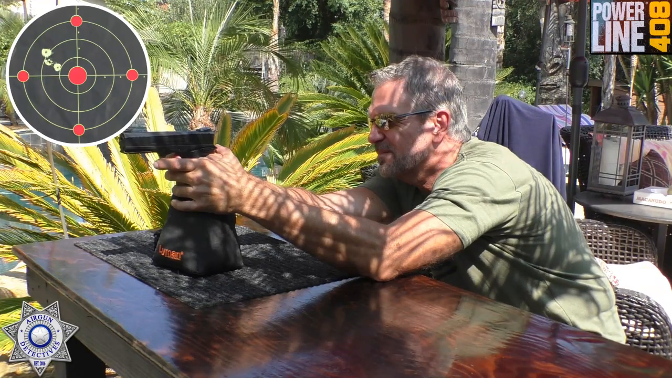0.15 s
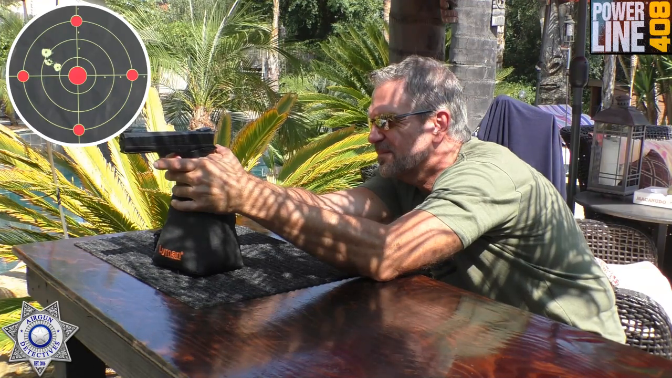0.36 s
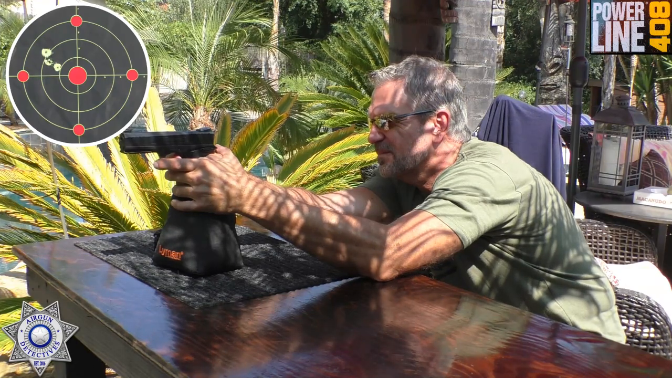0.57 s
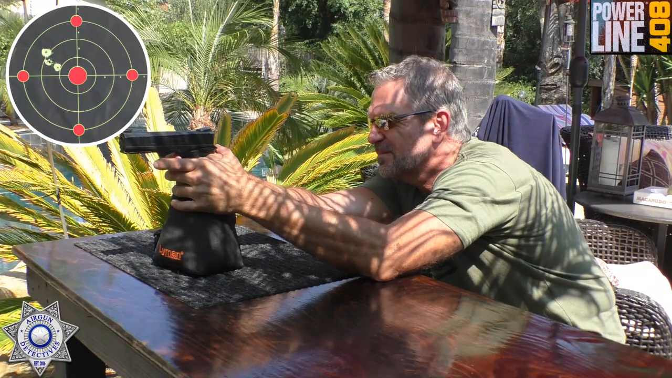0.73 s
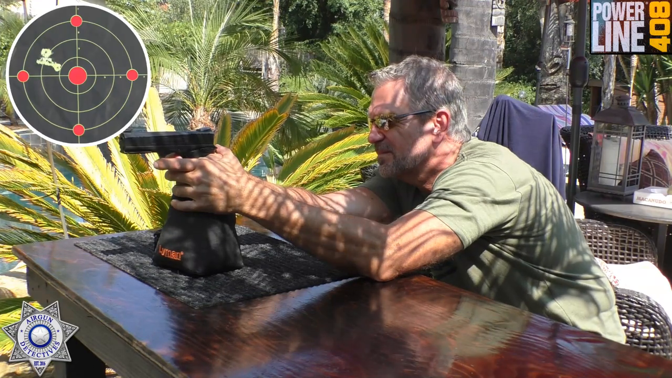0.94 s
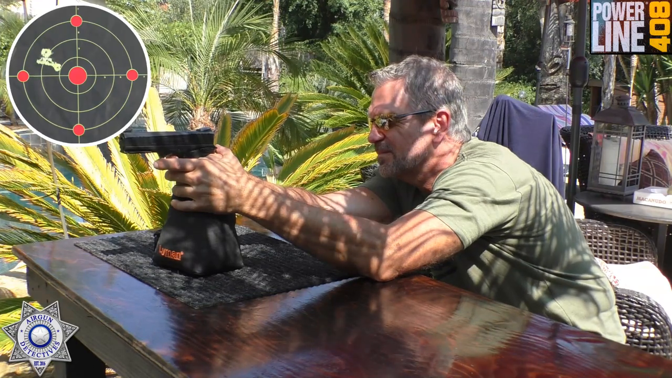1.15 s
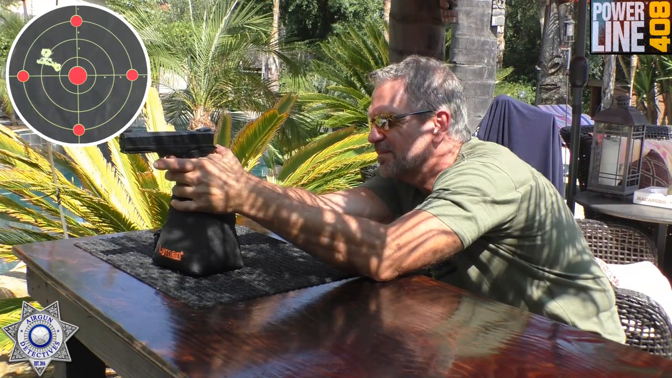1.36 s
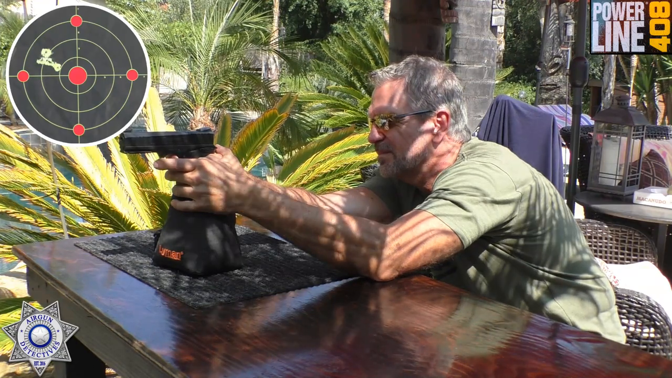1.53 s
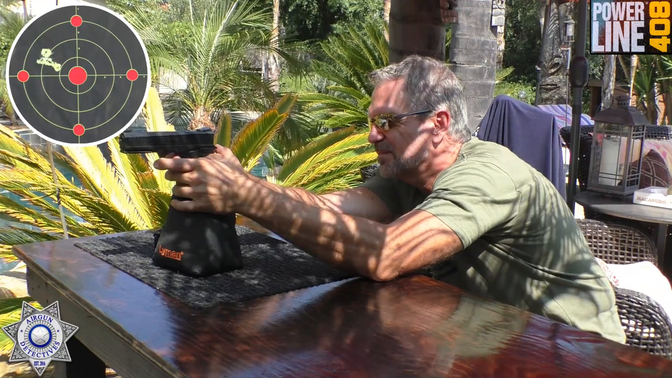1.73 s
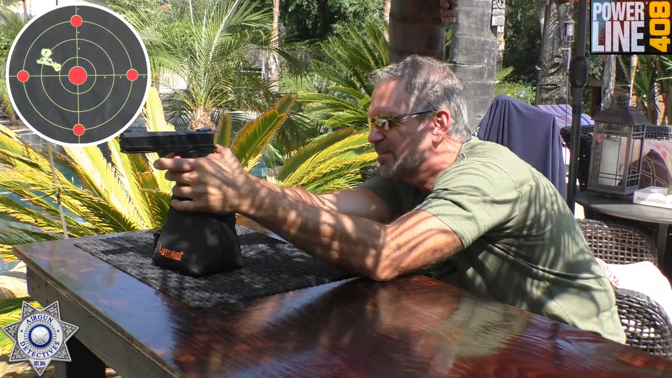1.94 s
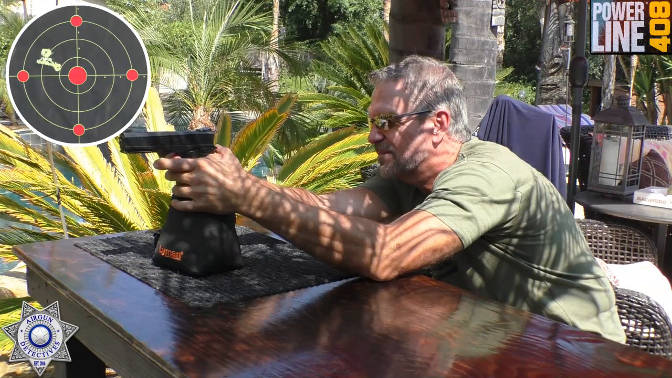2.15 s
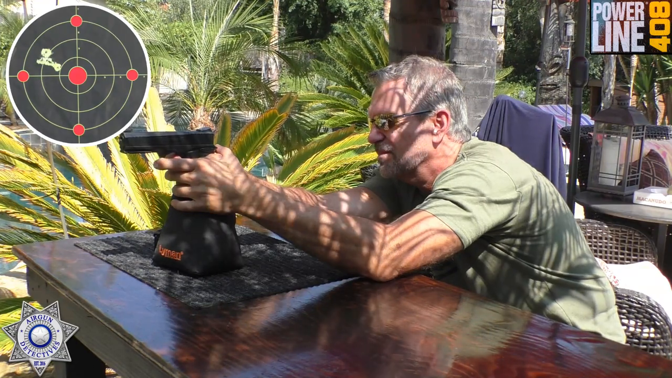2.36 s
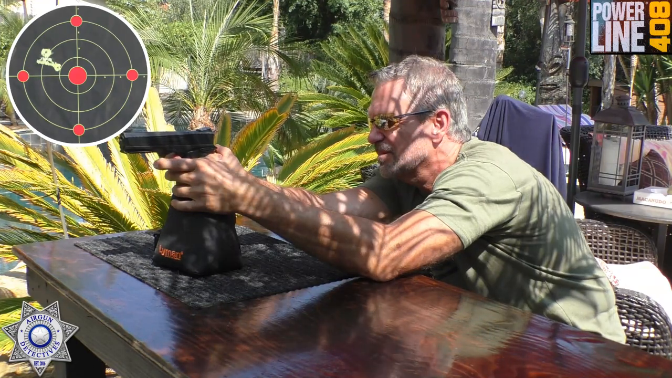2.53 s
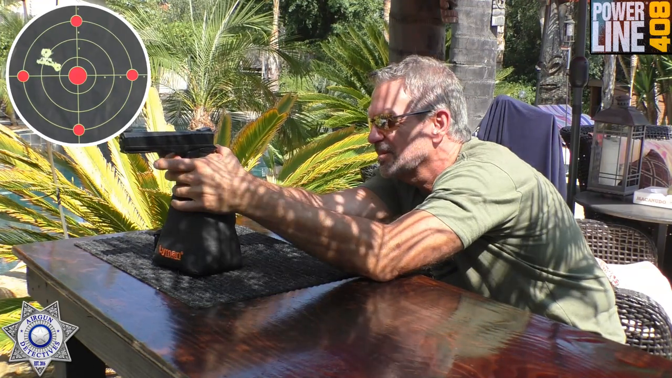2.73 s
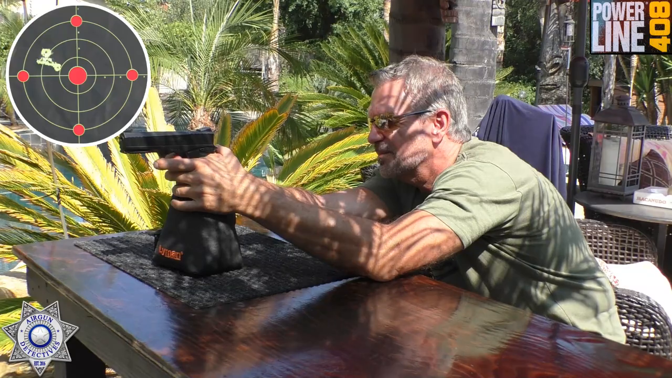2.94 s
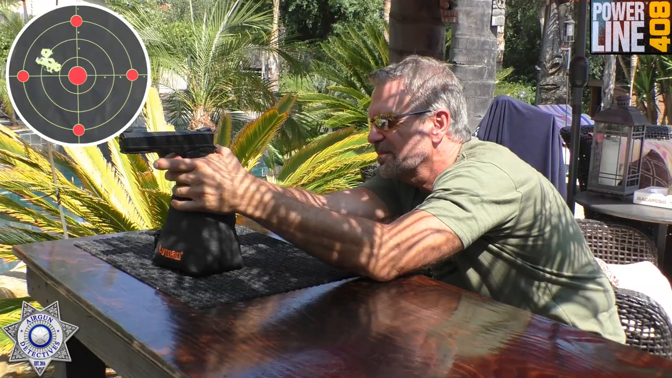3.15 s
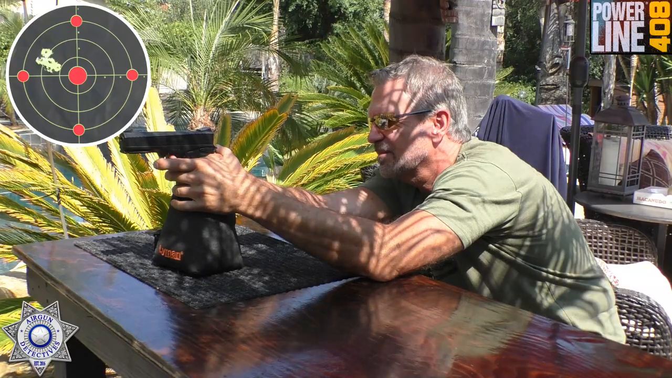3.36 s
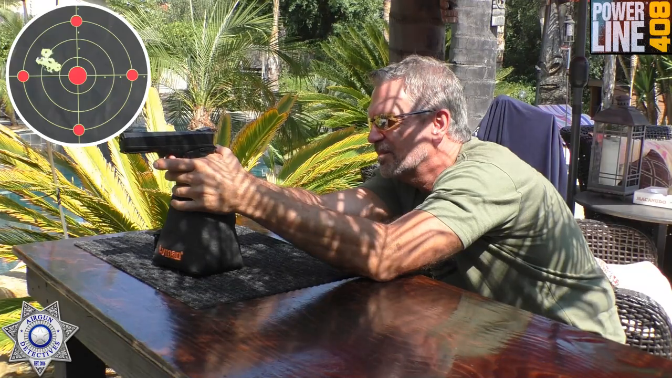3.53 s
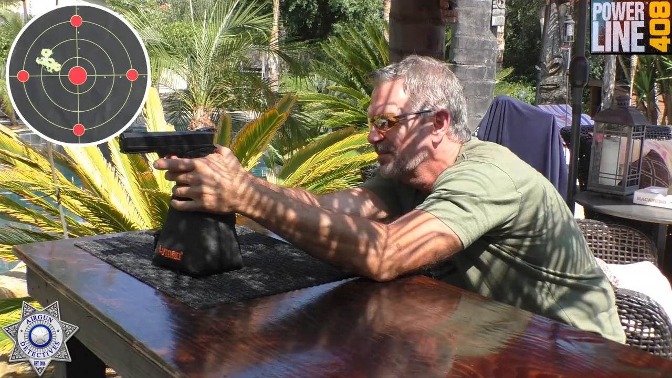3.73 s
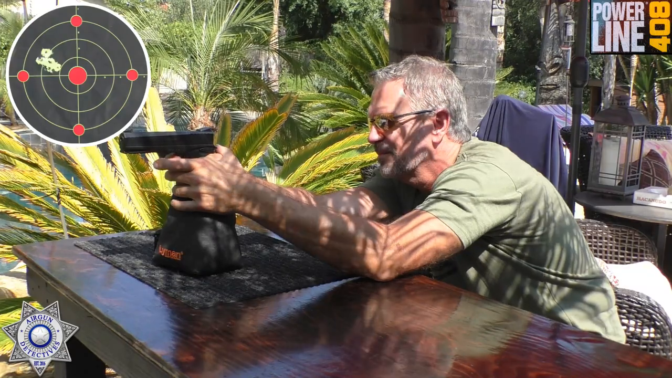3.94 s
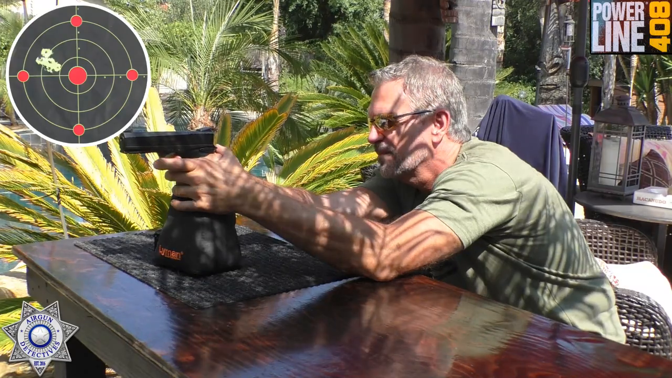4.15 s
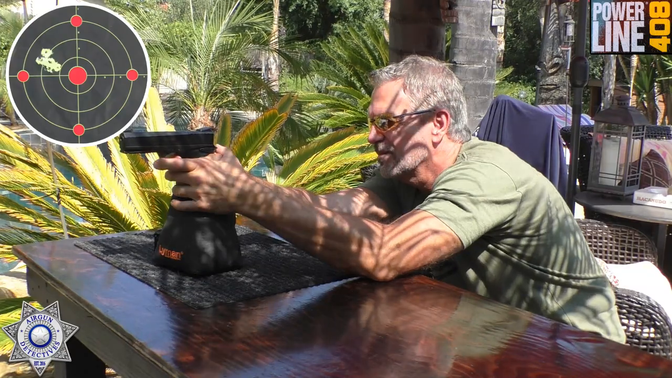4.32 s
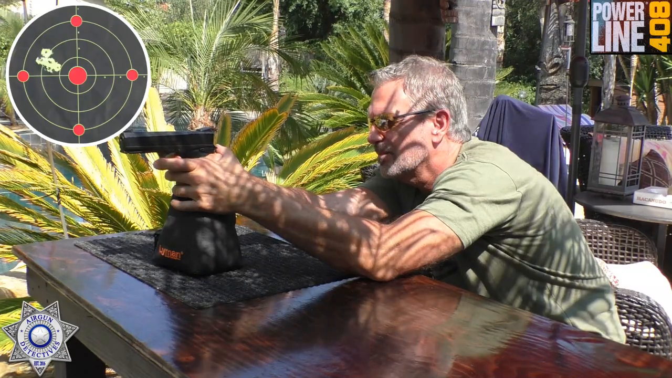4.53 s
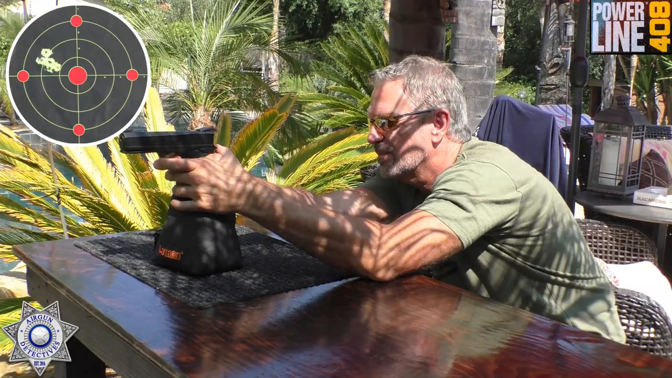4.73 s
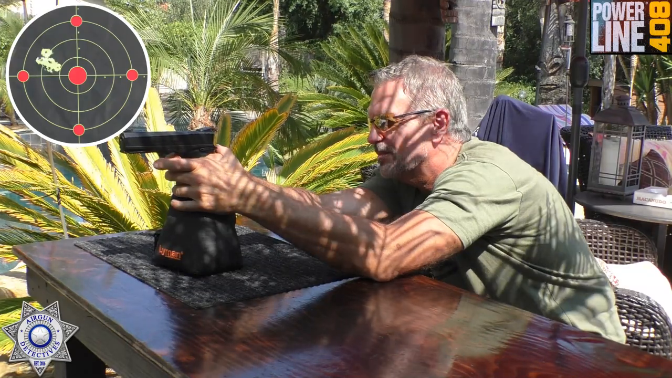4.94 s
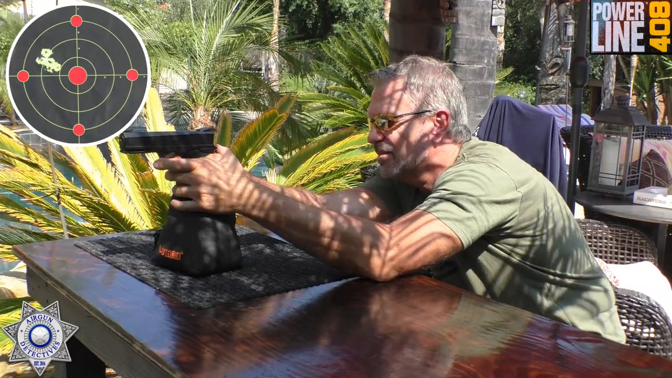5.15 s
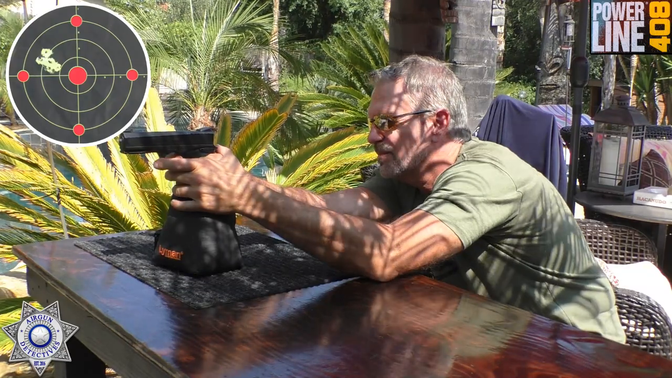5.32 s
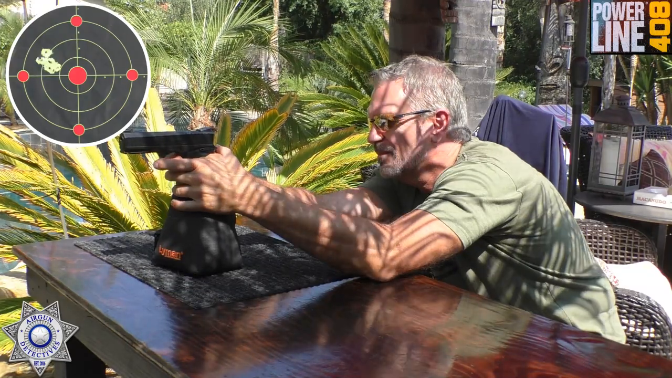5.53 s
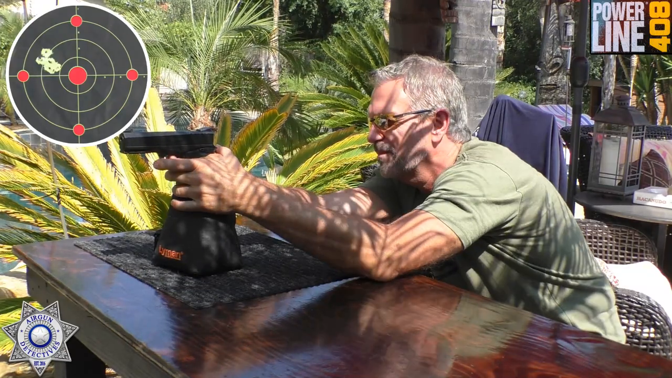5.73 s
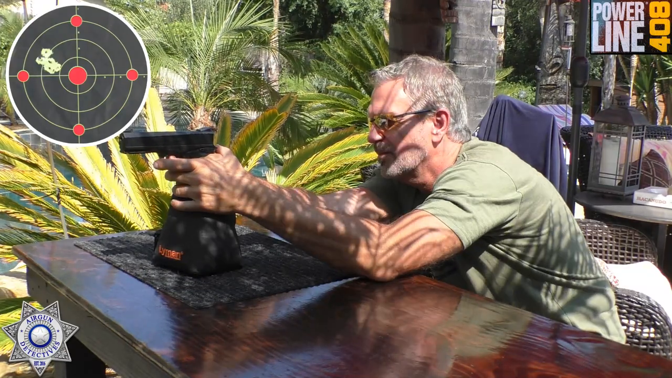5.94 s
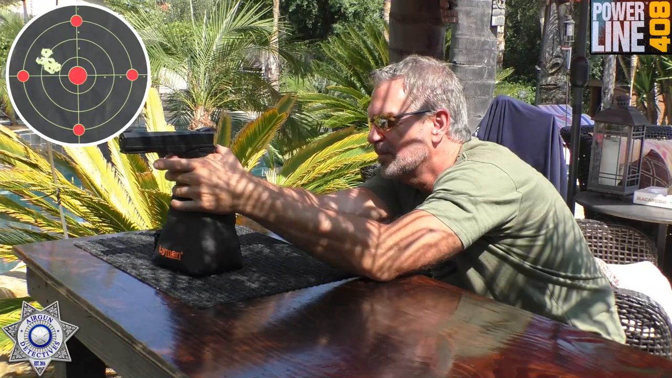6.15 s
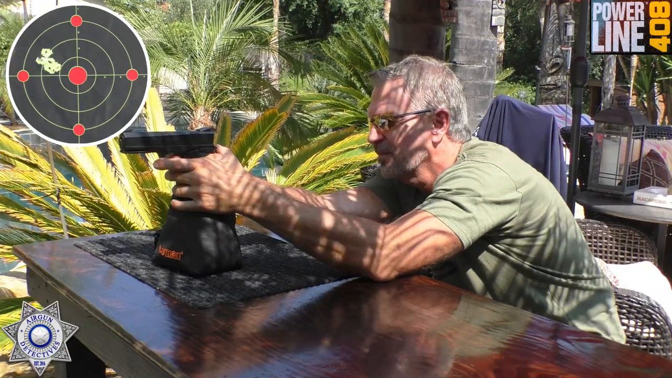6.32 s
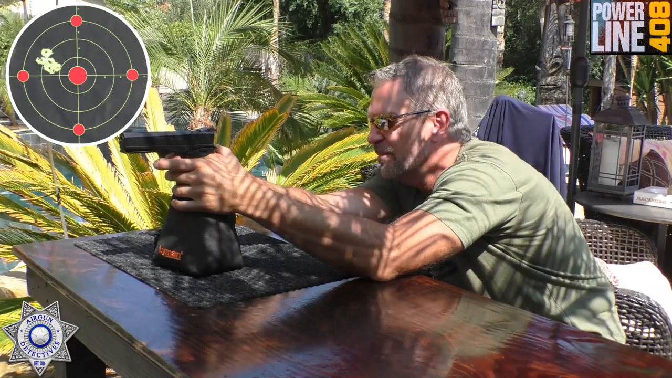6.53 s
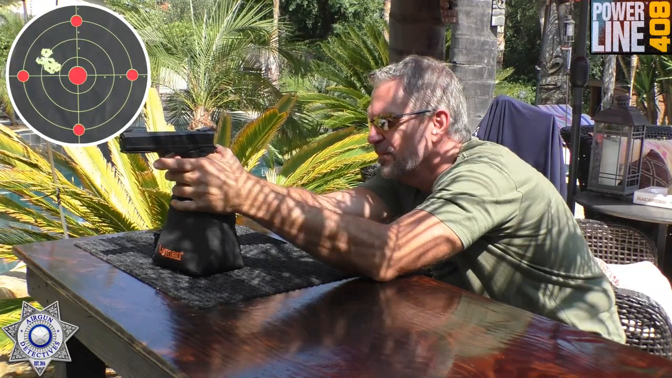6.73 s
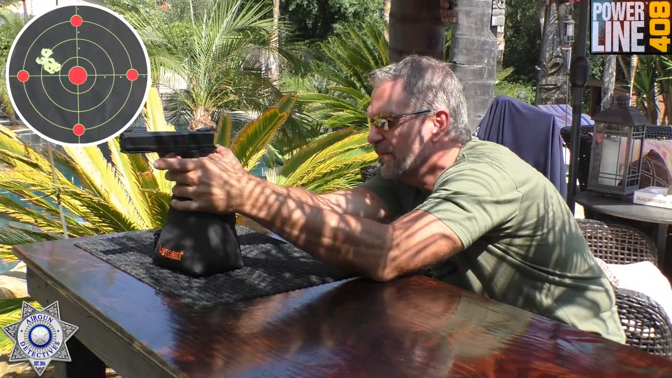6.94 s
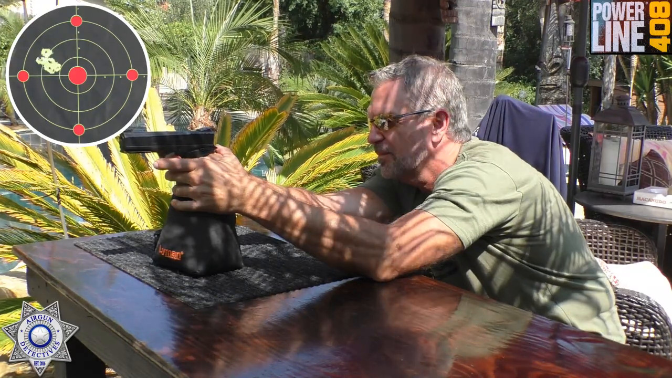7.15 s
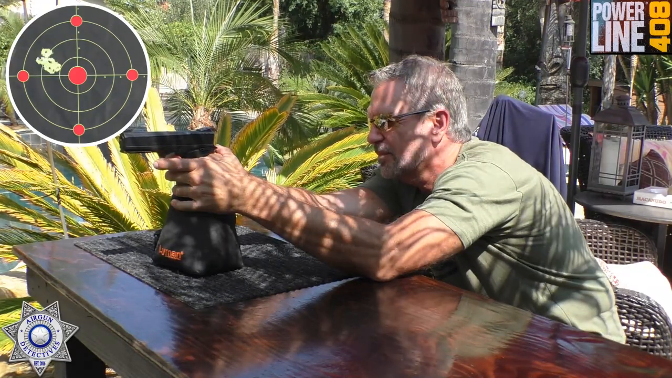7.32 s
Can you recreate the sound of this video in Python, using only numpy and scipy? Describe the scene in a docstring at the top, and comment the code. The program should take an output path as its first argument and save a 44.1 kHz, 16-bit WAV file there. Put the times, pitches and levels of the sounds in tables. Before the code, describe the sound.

A quiet garden opens with a soft rush of leaves and low, far traffic. At 0.8 seconds a close air pistol fires: a tiny scraping hammer run, then a loud, bright crack with a full midrange, brief steel ringing and a low gas puff. A fainter target smack lands some 0.07 seconds later, and the echo spreads through the trees, drawn out as the ducked level recovers. A steely tick at 1.17 and a double clack at 1.24 mark the trigger's return. Thin bird whistles fall at 1.4 and 2.4. The second shot comes at 3.0, with deeper thump, then clicks at 3.3 to 3.5. A very faint whistle follows at 4.0; a distant engine swells near 4.4. The third, slightly leaner crack comes at 5.3, with clicks at 5.7 and 5.8 and a tiny tick at 6.2. Dry fronds tick sparsely throughout; the breeze freshens towards the end.

```python
"""Far traffic and a soft rush of leaves, then a gas-powered air pistol fires three slow shots from a rest
on a garden table. Each shot: filtered noise for the hammer run, a short noise jet with ringing steel for
the crack, a decaying swell for the gas, a noise smack from the target and a noise tail for the garden echo.
The trigger returns with ticks and clacks of damped modes; dry fronds tick and a faint bird whistles in sines.
A gain control ducks at each crack and draws the echo out as it recovers."""
import sys
import numpy as np
from scipy import signal
from scipy.fft import rfft, irfft
from scipy.io import wavfile
from scipy.ndimage import uniform_filter1d, map_coordinates

SR = 44100
rng = np.random.default_rng(int(sys.argv[2]) if len(sys.argv) > 2 else 0)


def waveform_to_disk(signal):
    """Save audio, clipped to [-1, 1], as 16-bit WAV at the path in sys.argv[1]."""
    frames = np.transpose(np.atleast_2d(signal))
    scaled = np.clip(frames, -1, 1) * 32767
    samples = np.round(scaled).astype(np.int16)
    wavfile.write(sys.argv[1], SR, samples)


N = 329868  # samples


def amp(db):
    """Decibels to gain."""
    return 10 ** (np.asarray(db) / 20)


def unit(x):
    """Scale to rms 1."""
    return x / np.sqrt(np.mean(x ** 2) + 1e-20)


def seconds(length):
    """A time axis of the given length in seconds."""
    return np.arange(int(length * SR)) / SR


def add(track, s, sound):
    """Mix a sound into a track at time s."""
    start = max(round(s * SR), 0)
    room = track[..., start:start + sound.shape[-1]]
    room += sound[..., :room.shape[-1]]


def wobble(rate):
    """A smooth random curve as long as the scene, rate knots a second."""
    knots = rng.standard_normal(int(N * rate / SR) + 4)
    return map_coordinates(knots, [np.arange(N) * rate / SR])


def noise(size, alike):
    """White noise in two channels; alike is their correlation."""
    a, b = rng.standard_normal((2, size))
    turn = np.arccos(np.clip(alike, 0, 1)) / 2
    return np.cos(turn) * a + np.sin(turn) * np.array([b, -b])


def colour(x, points, size=8192):
    """Causal filter of unit energy through (Hz, dB) points."""
    f, db = np.transpose(points)
    gain = amp(np.interp(np.log(np.fft.rfftfreq(size, 1 / SR) + 1), np.log(f), db))
    # folding the cepstrum gives minimum phase
    cepstrum = irfft(np.log(gain + 1e-6))
    cepstrum[1:size // 2] *= 2
    cepstrum[size // 2 + 1:] = 0
    kernel = irfft(np.exp(rfft(cepstrum)))
    kernel = kernel / np.linalg.norm(kernel)
    return signal.fftconvolve(x, kernel[None], axes=1)[:, :x.shape[1]]


def fade(t, t60):
    """Exponential decay, 60 dB in t60 seconds."""
    return np.exp(-np.log(1000) * t / t60)


def attack(t, rise_s):
    """Exponential rise from silence towards 1."""
    return 1 - np.exp(-t / rise_s)


def ring(t, modes):
    """Damped modes (Hz, dB, t60 s), struck at new strengths each time."""
    strengths = amp(rng.normal(0, 1.5, len(modes)))
    total = 0
    for strength, (hz, db, t60) in zip(strengths, modes):
        tone = np.sin(2 * np.pi * (hz * t + rng.random()))
        total = total + strength * amp(db) * fade(t, t60) * tone
    return total


# The crack's spectrum before the body boost: pitch_hz [Hz], level_db [dB per Hz, relative]
CRACK_SPECTRUM = [(400, -1.5), (620, -2.5), (860, 0), (1080, 5), (1650, 1), (2100, 4), (3500, -4.5),
                  (4400, -1), (6300, -2), (7600, -10.5), (9500, 0), (10900, 3), (13000, 0), (16000, -4)]
# Single hard surfaces nearby: delay_s [s], level_db [dB]
NEARBY_SURFACES = [(.0055, -6.5), (.0069, -11), (0.015, -34), (0.034, -20)]
# Barrel and slide ringing on: pitch_hz [Hz], level_db [dB, relative], t60_s [s]
BARREL_MODES = [(2167, -3, .15), (5405, -5, .3), (5910, -6, .3), (6090, -3, .25), (6337, -5, .3),
                (6640, -5, .3), (7368, -6, .3), (8678, -3, .15), (8866, -6, .25), (10127, -5, .2),
                (10920, 0, .1), (12500, -2, .15)]


def muzzle(t, body_db):
    """The valve lets out a two-millisecond jet; nearby surfaces repeat its sharp front and the barrel rings."""
    # the jet holds all frequencies equally, at random phases; its treble differs between the channels
    jet = unit(irfft(np.exp(2j * np.pi * rng.random(size=45))))
    apart = amp(-17) * np.diff(rng.standard_normal(len(jet) + 1))
    crack = amp(-9.0) * fade(t, 0.026) * noise(len(t), 0.45)
    crack += amp(-26.5) * fade(t, 0.077) * noise(len(t), 0.63)
    add(crack, 0, np.array([jet + apart, jet - apart]))
    front = fade(t, 0.0044)
    for delay_s, level_db in NEARBY_SURFACES:
        add(crack, delay_s + rng.normal(0, 0.00018), amp(level_db) * front * noise(len(t), 0.32))
    # a fuller charge of gas swells the middle of the spectrum
    spectrum = [(hz, db + body_db * np.exp(-np.log(hz / 2400) ** 2)) for hz, db in CRACK_SPECTRUM]
    steel = amp(-34) * ring(t, BARREL_MODES)
    return colour(crack, spectrum) + steel


THUD_HZ, THUD_LAG_S, THUD_T60_S = 352, .0002, .013  # the table under the muzzle


def push(t, push_db, hz, thud_db):
    """The expanding gas: one swell of pressure, eddies in each channel and a thud from the table."""
    cycles = hz * t * (1 + 0.2 * np.array([[-1], [1]]))  # the swell lingers longer on the left
    swell = np.sin(2 * np.pi * cycles) * np.exp(-2.4 * cycles)
    eddies = colour(noise(len(t), 0), [(25, 1), (200, 0.5), (450, -2.5), (1500, -51)]) * fade(t, 0.02)
    since = np.maximum(t - THUD_LAG_S, 0)
    thud = np.sin(2 * np.pi * THUD_HZ * since) * fade(since, THUD_T60_S)
    air = amp(push_db) * (swell + amp(-9) * eddies) - amp(thud_db) * thud
    return signal.sosfilt(signal.butter(6, 480, fs=SR, output="sos"), air)


# Spectrum of the sliding hammer: pitch_hz [Hz], level_db [dB per Hz, relative]
HAMMER_SPECTRUM = [(200, -28), (1000, 1.5), (1650, -34), (2300, -4), (5000, -19), (8000, -6), (10500, -11),
                   (16000, -47)]


def hammer(t):
    """The hammer runs forward: a scrape that grows until the crack."""
    return colour(noise(len(t), 1.0), HAMMER_SPECTRUM) * attack(t, 0.0035)


# Spectrum of the struck target: pitch_hz [Hz], level_db [dB per Hz, relative]
SMACK_SPECTRUM = [(100, -12), (400, 1.5), (750, -10), (1200, 0.5), (3000, 1), (5000, -2.5), (9000, 0.5),
                  (12000, -2.5), (16000, -11)]


def smack(t):
    """The pellet punches the target, which rattles briefly."""
    decay = fade(t, 0.12) + .4 * fade(t, .006)
    return colour(noise(len(t), 0.32) * decay, SMACK_SPECTRUM)


# The patio answers at once, the trees after their round trip, distant surfaces faintly
PATIO_DB, PATIO_T60_S = -19, 0.22
TREES_DB, TREES_DELAY_S, TREES_RISE_S, TREES_T60_S = -30.5, 0.058, .008, 1.19
EDGE_S, EDGE_T60_S = 0.26, 0.72  # round trip to the garden's edge, and the extra decay beyond it
DISTANT_DB, DISTANT_T60_S = -56, 4.4


def echo_envelope(t):
    """Three decays add in power: patio, trees up to the garden's edge, and distant surfaces."""
    patio = amp(PATIO_DB) * fade(t, PATIO_T60_S)
    since = np.maximum(t - TREES_DELAY_S, 0)
    beyond = np.maximum(t - EDGE_S, 0)
    trees = amp(TREES_DB) * attack(since, TREES_RISE_S) * fade(since, TREES_T60_S) * fade(beyond, EDGE_T60_S)
    distant = amp(DISTANT_DB) * fade(t, DISTANT_T60_S)
    return np.sqrt(patio ** 2 + trees ** 2 + distant ** 2)


# Spectrum of the echo before its treble loss: pitch_hz [Hz], level_db [dB per Hz, relative]
GARDEN_SPECTRUM = [(80, -15), (350, -0.5), (750, -15.5), (1200, -1), (2200, 0), (4000, -2.5), (7500, -2),
                   (12300, -4), (13500, -9), (16000, -17)]


def garden(t):
    """Countless echoes off foliage; the farther they travel, the more treble they lose."""
    hz, delay, z = signal.stft(colour(noise(len(t), 0.65), GARDEN_SPECTRUM), SR, nperseg=256)
    lost_db = 20 * delay * (hz[:, None] / 10000) ** 2
    tail = signal.istft(z * amp(-lost_db), SR, nperseg=256)[1][:, :len(t)]
    unevenness_db = 0.58 * wobble(200)[:len(t)] + wobble(35.7)[:len(t)]
    return tail * echo_envelope(t) * amp(unevenness_db)


# The shots: start_s [s], crack_db [dB], body_db (midrange boost) [dB], push_db (gas) [dB], push_hz [Hz],
# thud_db (table) [dB], echo_db [dB], smack_db (target) [dB], flight_s (smack delay) [s]; relative levels
SHOT_LIST = [(0.8166, 5.5, 8.5, 0, 210, -14, 1.5, -20.5, .0654),
             (3.0175, 4.5, 4, 4, 115, 0, 1, -19.5, .0665), (5.3450, 3, -1.5, 0, 125, 3, 0.5, -24.5, .0695)]
PUSH_LEAD_S = .001  # head start that makes up for the low-pass delay, so the swell begins with the crack


def shots():
    """Hammer run, muzzle crack, gas push, target smack and echo of every shot."""
    out, t, run = np.zeros((2, N)), seconds(0.99), seconds(0.0062)
    for start_s, crack_db, body_db, push_db, push_hz, thud_db, echo_db, smack_db, flight_s in SHOT_LIST:
        add(out, start_s - len(run) / SR, amp(-22.5) * hammer(run))
        balance = amp([[.6], [-.6]])  # dB, slightly to the left
        add(out, start_s, amp(crack_db) * muzzle(t, body_db) * balance)
        add(out, start_s - PUSH_LEAD_S, push(t, push_db, push_hz, thud_db))
        add(out, start_s + flight_s, amp(smack_db) * smack(t))
        add(out, start_s, amp(echo_db) * garden(t))
    return out


def contact(t, resonances, scrape_db, scrape_t60, spread_db, spread_t60):
    """Steel on steel: short resonances, a burst of noise and the scatter from the table and roof."""
    # a wider resonance dies sooner
    modes = [(hz, db, np.log(1000) / (np.pi * width)) for hz, width, db in resonances]
    burst = amp(scrape_db) * fade(t, scrape_t60) * noise(len(t), .92)
    scatter = amp(spread_db) * fade(t, spread_t60) * noise(len(t), 0.68)
    blow = (ring(t, modes) + burst) * attack(t, 0.00044)
    spectrum = [(200, -13), (720, -18.0), (1100, -10.5), (1900, 0), (5000, -2), (10000, -2.5), (16000, -5.5)]
    return colour(blow + scatter, spectrum)


# The pawl slips back: start_s [s], level_db [dB, relative]
PAWL_TICKS = [(1.1681, -29.5), (3.3199, -30), (3.4877, -41), (5.7269, -28), (6.2117, -46)]
# Steel of the pawl: pitch_hz [Hz], width_hz [Hz], level_db [dB, relative]
PAWL_RESONANCES = [(2440, 266, 0), (3320, 400, 6), (4100, 250, 0), (4750, 180, 0), (5900, 160, -3),
                   (6700, 150, -17), (7300, 180, -22), (9600, 460, 0), (12750, 200, 2), (15400, 200, -8)]


def pawl():
    """The trigger's pawl slips back in steely ticks."""
    out, t = np.zeros((2, N)), seconds(.3)
    for start_s, level_db in PAWL_TICKS:
        tick = contact(t, PAWL_RESONANCES, scrape_db=8, scrape_t60=0.018, spread_db=-11.5, spread_t60=0.33)
        add(out, start_s, amp(level_db - 6.0) * tick)
    return out


# The trigger hits its stop: start_s [s], level_db [dB, relative], thump_db (frame) [dB]
STOP_CLACKS = [(1.2380, -21, -33), (3.4124, -21, -33.5), (5.7963, -20.5, -33.5)]
# Steel of the stop: pitch_hz [Hz], width_hz [Hz], level_db [dB, relative]
STOP_RESONANCES = [(1080, 100, -8), (1950, 254, -4), (2450, 290, 1.5), (3630, 240, -12), (4340, 410, -3.5),
                   (5260, 300, -5.5), (8310, 300, -29), (9650, 260, -4), (13600, 400, -9)]


def stop():
    """The trigger hits its stop, bounces once and thumps the frame."""
    out, t = np.zeros((2, N)), seconds(.3)
    for start_s, level_db, thump_db in STOP_CLACKS:
        for delay_s, blow_db in [(0, 0), (.0033, -4.5)]:
            clack = contact(t, STOP_RESONANCES, scrape_db=-1, scrape_t60=0.0081,
                            spread_db=-18.0, spread_t60=0.19)
            add(out, start_s + delay_s, amp(level_db + blow_db) * clack)
        thump = np.sin(2 * np.pi * 212 * t) * fade(t, .12) * attack(t, 0.0014)
        add(out, start_s + 0.00444, amp(thump_db) * thump)
    return out


def fronds():
    """Dry fronds touch now and then with tiny ticks, 22 at random times."""
    out, t = np.zeros((2, N)), seconds(.08)
    for when, strength in rng.random(size=(22, 2)):
        touch = noise(len(t), 0.82) * fade(t, .05)
        tick = colour(touch, [(500, -22), (2000, -11), (9000, -4), (16000, -7)])
        add(out, when * N / SR, amp(-58.0 + 10 * strength) * tick)
    return out


# Bird whistles: start_s [s], length_s [s], start_hz [Hz], end_hz (approached) [Hz], level_db [dB]
BIRD_WHISTLES = [(1.36, .27, 6200, 5900, -67), (2.385, .28, 5300, 4100, -64), (3.98, .35, 6000, 5800, -71)]
BIRD_WAVER_HZ, BIRD_ATTACK_S, BIRD_FLUTTER_DB = 35, .012, 1.5


def bird():
    """Thin falling whistles from far off: wavering sines."""
    out = np.zeros((2, N))
    for start_s, length_s, start_hz, end_hz, level_db in BIRD_WHISTLES:
        t = seconds(length_s)
        glide_hz = end_hz + (start_hz - end_hz) * np.exp(-2.5 * t / length_s)
        hz = glide_hz + BIRD_WAVER_HZ * wobble(157)[:len(t)]
        flutter = amp(BIRD_FLUTTER_DB * wobble(45)[:len(t)])
        shape = attack(t, BIRD_ATTACK_S) * np.sqrt(1 - t / length_s)
        add(out, start_s, amp(level_db) * flutter * np.sin(2 * np.pi * np.cumsum(hz) / SR) * shape)
    return out


# Spectrum of the rush: pitch_hz [Hz], level_db [dB per Hz, relative]
LEAVES_SPECTRUM = [(410, -48), (700, -5), (808, -16), (898, -9.5), (971, -2.5), (1150, 0.5), (2220, -2),
                   (2960, -4), (3640, -5.5), (4990, -10.5), (9730, -11), (15200, -16.5), (16000, -32)]
# the breeze eases to a lull, then freshens
LULL_S, LULL_DB, EASE_DB_PER_S, FRESHEN_DB_PER_S = 3.5, -56, 0.6, 1.08


def leaves():
    """A soft rush of leaves follows the breeze."""
    t = np.arange(N) / SR
    breeze_db = LULL_DB + np.maximum(EASE_DB_PER_S * (LULL_S - t), FRESHEN_DB_PER_S * (t - LULL_S))
    return amp(breeze_db + 0.25 * wobble(5.4)) * unit(colour(noise(N, 0.78), LEAVES_SPECTRUM))


# one far engine swells and recedes
DRONE_HZ, DRONE_DB, DRONE_NEAREST_S, DRONE_PASS_S = 127.5, -56.5, 4.4, .5


def engine():
    """One far engine passes: a wavering sine, louder as its distance shrinks."""
    t = np.arange(N) / SR
    distance = np.hypot(1, (t - DRONE_NEAREST_S) / DRONE_PASS_S)  # in units of the closest distance
    level = amp(DRONE_DB + 2.5 * wobble(4.46)) / distance
    hz = DRONE_HZ + 2.57 * wobble(22.02)
    return level * np.sin(2 * np.pi * np.cumsum(hz) / SR)


# Spectrum of the rumble: pitch_hz [Hz], level_db [dB per Hz, relative]
TRAFFIC_SPECTRUM = [(12, -36), (20, -34), (38, -12), (119, -2.5), (135, -3.5), (225, -9.5), (256, -8.5),
                    (286, -12), (387, -13.5), (515, -17.5), (576, -24), (676, -28), (900, -25), (1170, -51),
                    (1980, -120)]


def traffic():
    """Far traffic rumbles: low noise of gently wandering level."""
    return amp(-54 + 1.37 * wobble(6)) * unit(colour(noise(N, 0.85), TRAFFIC_SPECTRUM))


def scene():
    """The pistol close by, the garden all round."""
    pistol = shots() + pawl() + stop()
    return pistol + fronds() + bird() + leaves() + engine() + traffic()


def gain_control(x, threshold_db, recovery_db):
    """Gain drops at once by the excess over the threshold and climbs back by recovery_db a second."""
    power = np.abs(uniform_filter1d(np.mean(x ** 2, axis=0), size=64))
    excess = np.maximum(10 * np.log10(power + 1e-12) - threshold_db, 0)
    climb = recovery_db * np.arange(N) / SR
    return x * amp(climb - np.maximum.accumulate(excess + climb))


TOP_HZ = 16000  # band limit


def record(dry):
    """The cracks duck the gain and still clip; a steep low-pass then cuts the top."""
    held = gain_control(dry, threshold_db=-5.5, recovery_db=35)
    clipped = held / (1 + np.abs(held / .92) ** 8) ** (1 / 8)  # peaks flatten towards 0.92
    low_pass = signal.firwin(255, TOP_HZ, window="blackman", fs=SR)
    return signal.fftconvolve(clipped, low_pass[None], mode="same", axes=1)


dry = scene()
out = record(dry)
waveform_to_disk(out)
```